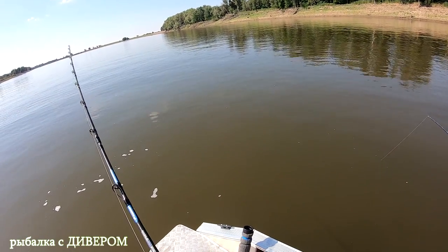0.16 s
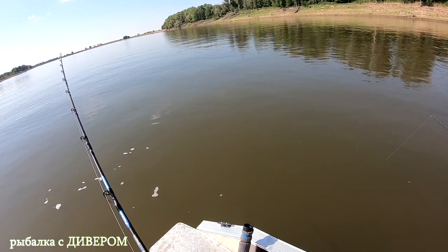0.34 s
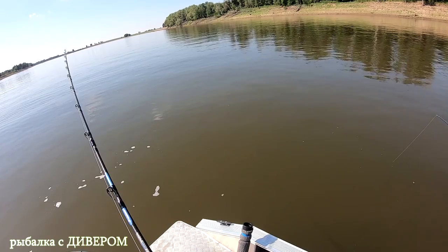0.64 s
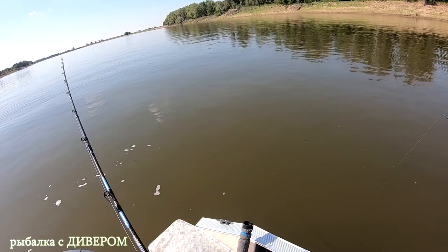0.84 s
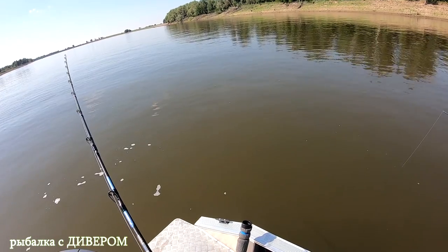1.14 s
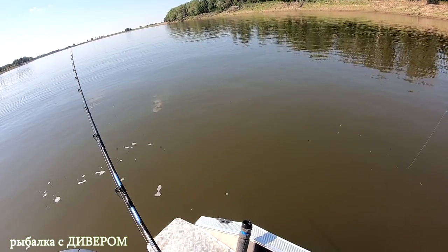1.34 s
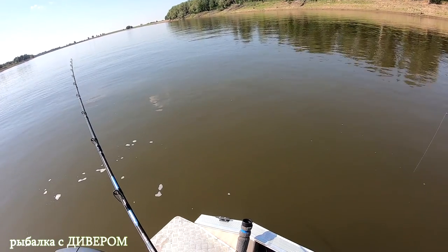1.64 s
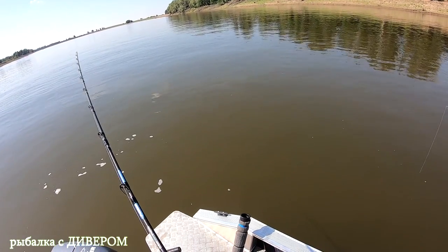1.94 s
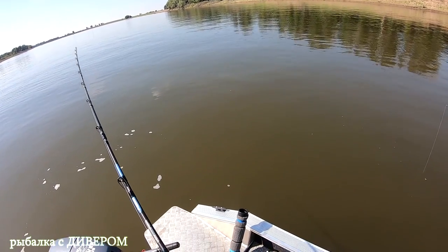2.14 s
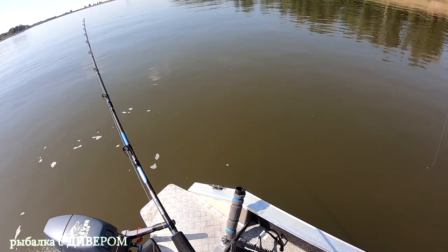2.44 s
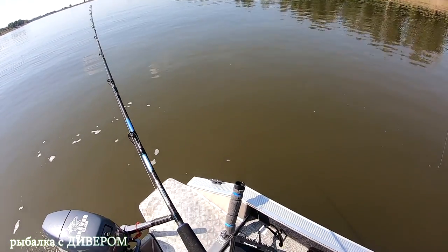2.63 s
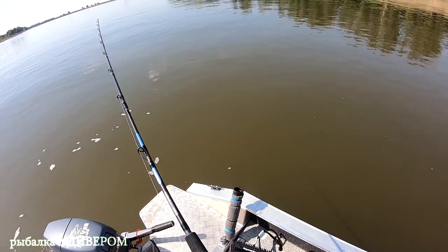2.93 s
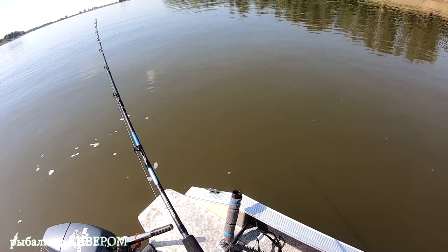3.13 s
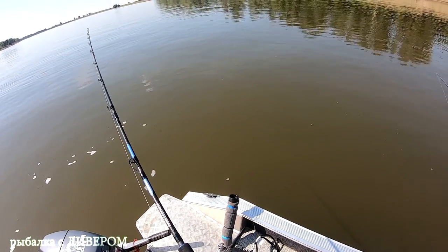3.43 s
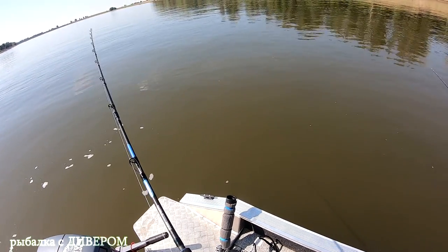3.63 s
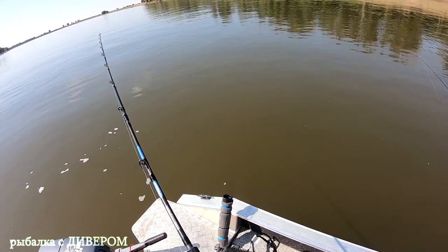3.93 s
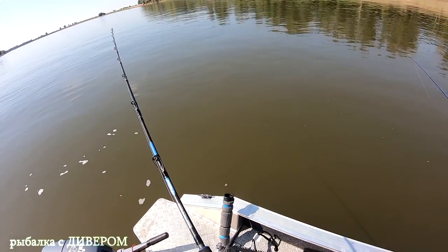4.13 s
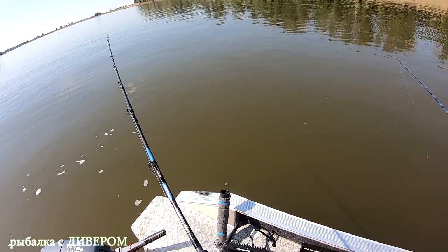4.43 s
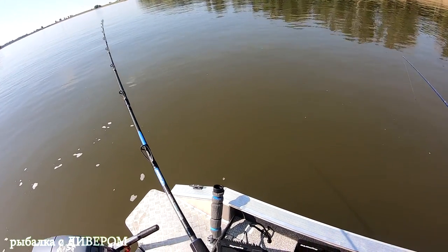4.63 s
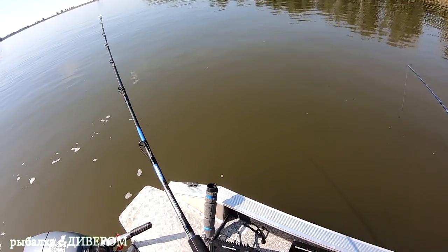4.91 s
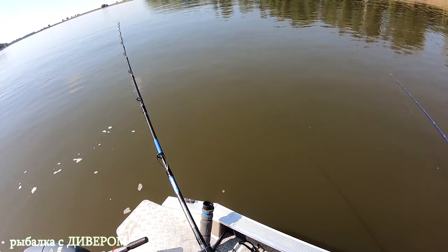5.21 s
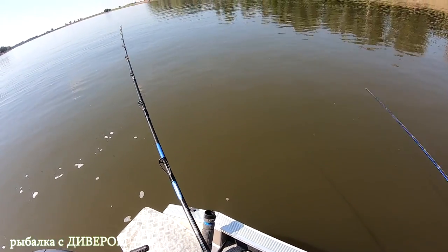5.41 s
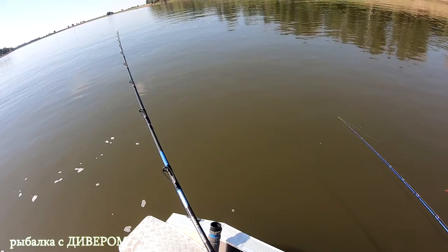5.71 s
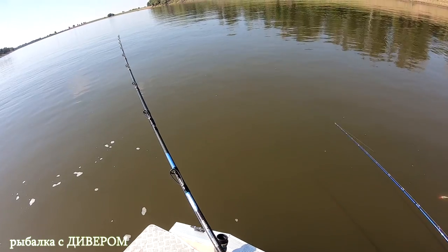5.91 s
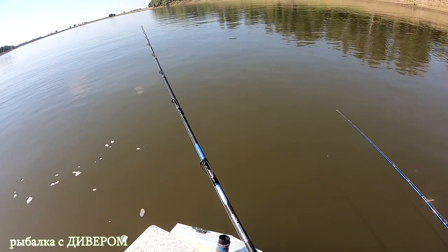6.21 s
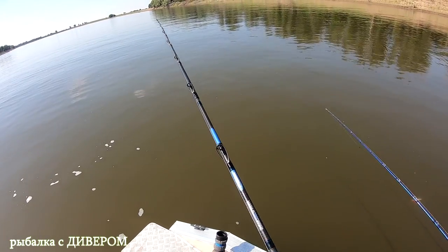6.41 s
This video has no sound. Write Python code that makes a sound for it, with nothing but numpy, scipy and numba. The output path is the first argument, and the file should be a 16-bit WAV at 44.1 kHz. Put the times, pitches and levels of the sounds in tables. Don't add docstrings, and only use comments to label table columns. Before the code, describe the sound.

Loud, uneven motor putter fills the foreground from start to end: fast clusters of deep exhaust knocks, spitting gas, then weak misfired puffs. A fine rapid ratchet from a hand-wound reel sits quietly on the right, then stops near three seconds. Small watery warbles, scattered metallic ticks and a soft hiss of wash surround it. Close stereo pickup aboard a small boat, open air, no echo.

```python
import sys
import numpy as np
from scipy import signal
from scipy.fft import rfft, irfft
from scipy.io import wavfile
from numba import njit

SR = 44100
rng = np.random.default_rng(int(sys.argv[2]) if len(sys.argv) > 2 else 0)


def generate_wav(sig):
    pcm = np.round(np.clip(np.atleast_2d(sig).T, -1, 1) * 32767).astype(np.int16)
    wavfile.write(sys.argv[1], SR, pcm)


def elevation(decibels):
    levels = np.asarray(decibels, float)
    return 10 ** (levels / 20)


N = 289296

# t/s, thump peak level/dB, crack level/dB, thump step per further firing/dB
SPELLS = [(0.025, -7.5, -39, 11), (0.1153, -6, -46, -0.5), (0.2669, -4, -43, -0.5),
          (0.5475, -6, -45.5, 0.5), (0.6799, -5.5, -45.5, 0), (1.1759, -5.5, -41.5, -0.5),
          (1.51, -8, -42, 4), (1.861, -6.5, -42.5, 1), (2.007, -8, -42.5, -1.5), (2.3298, -6, -41, -5),
          (2.443, -11.5, -40.5, 2), (2.6593, -3, -40, -2.5), (2.7874, -7, -39.5, 1.5),
          (2.9434, -6.5, -40, -1), (3.1573, -5.5, -44, -1), (3.2768, -3.5, -40.5, -5.5),
          (3.6409, -5, -40, -0.1), (3.893, -5, -40.5, -3.5), (4.144, -6.5, -41, 0.5),
          (4.3815, -15.5, -40.5, 2.1), (4.611, -8, -42.5, 1.5), (4.7918, -11.5, -42, 2.5),
          (5.0291, -4.5, -46.5, -5), (5.397, -7.5, -42.5, -2.5), (5.5136, -10, -41.5, 2),
          (5.7525, -5, -38, 3), (5.846, -3.5, -45, -1), (6.057, -5.5, -38, -3), (6.256, -9.5, -49, 3.5),
          (6.345, -6, -41, -10.5)]
RHYTHMS = [(3, 3, 2), (5, 5, 4), (9, 9, 8), (4, 4, 3), (16, 4, 3), (11, 4, 2), (12, 4, 2), (5, 5, 3),
           (11, 4, 2), (4, 4, 3), (7, 7, 5), (4, 4, 2), (5, 5, 3), (7, 4, 2), (4, 4, 3), (12, 4, 2),
           (8, 8, 6), (8, 4, 2), (8, 4, 2), (8, 8, 7), (6, 6, 5), (8, 4, 3), (12, 4, 2), (4, 4, 2),
           (8, 8, 6), (3, 3, 1), (7, 4, 2), (7, 4, 2), (3, 3, 2), (8, 4, 2)]
CRACK_BY_PLACE_DB = [0.22, 1.1, -1.3, -2.7]
# t/s, thump change/dB, bark change/dB, crack change/dB
ODD_FIRINGS = [(0.0553, -8, 4, -6), (0.112, 2, -9.5, -4.5), (0.146, 1.5, 0, 2.5), (0.1754, 4, -1, 9),
               (0.4207, -0.5, -3, -6.5), (0.547, 1, -2, 0.5), (0.6795, 1, 3, 5), (0.7418, 0.5, -4.5, -0.5),
               (0.8036, 0.5, -1, -1), (0.8355, -0.5, -5, 2), (0.9606, -3.5, -5.5, 5), (0.9901, -3, 1, -2),
               (1.0536, 1, -2, -3.5), (1.1137, -4.5, -11, -2), (1.509, -1.5, 0, 0), (1.5386, -1, 4, 0.5),
               (1.6259, -0.5, -1.5, 3), (2.1263, 3.5, -3.5, 3), (2.238, -0.5, 0.5, 2.5),
               (2.3269, -3.5, -4, 2.5), (2.355, 3.5, 6, 0.5), (2.3813, 8.5, -4.5, -0.5),
               (2.4738, 3.5, 5, -1.5), (2.5027, -0.5, -3, -5.5), (2.7873, -1, 1.5, 1),
               (2.9452, -2.5, -2.5, -0.5), (3.0961, 2.5, 2.5, -4.5), (3.7021, -3, -4.5, -12.5),
               (4.383, 4.5, 5, 0.5), (4.408, 6.5, -3.5, -2), (4.5253, 1, -1.5, 4.5), (4.7008, 1.5, -2.5, 1),
               (4.731, -2, -3, -0.5), (4.7914, 4, -7.5, -6.5), (4.9077, 1.5, 0.5, -8),
               (4.942, -1.5, -9.5, 0), (4.9704, 3, 3, 3), (5.0273, 0, -19, -0.5), (5.0584, 3.5, 3.5, 4.5),
               (5.1791, 1.5, -2.5, 2.5), (5.3021, 5, -5.5, -4), (5.5132, 3.5, -5, 0.5),
               (5.601, 1.5, -11, 1.5), (5.6325, -4.5, -5, 3.5), (5.9629, 3, -3, 5),
               (6.1952, 2.5, -12.5, -13.5), (6.257, 3, -17, 8), (6.344, 1.5, 2.5, 9), (6.3729, 10, 0.5, -3)]
# t/s, thump change/dB, bark change/dB, crack change/dB
ODD_PUFFS = [(0.6437, 1, -13, -1.5), (0.769, -1.5, -8, -7), (1.3816, 1, -9, 2.5), (1.5637, 1, -0.5, -1.5),
             (1.5924, 0.5, 1, 3), (1.828, -1.5, 6, -4), (2.0932, -5, -3, 1), (2.1801, -2.5, 5.5, 5.5),
             (2.2968, 0.5, 8, 3), (2.4122, 3, 0, -1), (2.7508, 0.5, -6, -5.5), (2.878, -1, -10, -1.5),
             (3.0017, 0.5, -8.5, -1), (3.2455, 1, -2, -0.5), (3.3346, -11.5, 22.5, -2.5),
             (3.4574, -3.5, 10, 3.5), (3.4843, 0.5, -3, -1), (3.575, -1.5, 2, 4), (3.827, -1.5, -1, -6),
             (3.9841, -5.5, -10, -7), (4.1124, -1, -9, 2.5), (4.2331, -6, 10, 3.5), (4.321, -2, 1.5, 4.5),
             (4.3489, -2.5, 10, 3), (4.8775, 2, -7, 4.5), (4.9928, -2, -2, -5.5), (5.0857, -3.5, 10, 2),
             (5.1133, -1, -4, -6), (5.2137, -2, 0.5, -3.5), (5.2411, 0, -20, 2.5), (5.3343, -3, -8, -7.5),
             (5.4535, -4.5, 5, 2), (5.8129, -1, -6.5, -0.5), (5.934, 1.5, 6.5, 9), (6.1392, 3, 0, 5),
             (6.5123, 2.5, 5.5, -0.5)]
# t/s, crack level change/dB
ODD_CRACKS = [(0.056, 1.5), (0.09, -12), (0.299, -1.5), (0.549, -2.5), (0.837, 0.5), (0.866, 3),
              (0.961, -1), (1.084, 3), (1.266, -8), (1.328, -2.5), (1.45, -5), (1.511, 2.5), (1.745, 1),
              (1.946, -5), (2.096, -2), (2.211, 0.5), (2.27, -0.5), (2.596, -5), (2.946, 4.5), (2.975, -3),
              (3.307, -1.5), (3.489, 3), (3.829, -1), (3.956, 6), (3.983, -1), (4.293, -1.5), (4.44, -4),
              (4.554, 4), (4.672, 4.5), (4.761, 2.5), (5.004, 1), (5.152, 2.5), (5.181, -1), (5.304, 3.5),
              (5.428, 2.5), (5.458, -2), (5.515, 0), (5.544, -2), (5.602, 1), (5.877, 4), (5.964, -0.5),
              (5.995, 5.5), (6.223, 2), (6.286, 2), (6.346, -4.5)]
# t/s, pitch change of the three lower leg modes/semitones
ODD_PITCH = [(0.025, 0), (0.09, 3), (0.115, -2), (0.207, -0.5), (0.517, 4), (0.614, 0.5), (0.837, 1.5),
             (0.961, 2), (0.991, -2), (1.266, 2.5), (1.511, 2.5), (1.92, 2.5), (2.069, -4.4), (2.154, 2),
             (2.184, -2), (2.299, -1), (2.504, 0), (2.789, -1.5), (2.899, 3.5), (3.067, 0.2), (3.129, 1),
             (3.188, 1.2), (3.335, 3.5), (3.829, -3), (3.861, 2), (3.925, 2.6), (3.983, -2), (4.051, 2),
             (4.119, 4), (4.233, 5), (4.355, -1.5), (4.383, -6), (4.41, 2), (4.44, -4.7), (4.496, -2),
             (4.584, 3.5), (4.612, -5.5), (4.761, 3.5), (4.791, -0.5), (4.905, -4), (5.004, -3.7),
             (5.096, -4), (5.215, 1.5), (5.245, 2), (5.304, 1.5), (5.34, -1), (5.366, 3.5), (5.515, -4.5),
             (5.575, -6), (5.602, 4), (5.663, 3), (5.723, 3.5), (5.785, 3.0), (5.936, -1), (5.964, 2),
             (6.198, -2.5), (6.257, 2), (6.374, 1.5)]
TURN_S = 0.029
KICK_S = 0.00061
PUFF_DB = -9.5

# f/Hz, level/dB, decay/ms, build-up/ms
LEG = [(87, -20.5, 3.1, 3.2), (154.4, -4.5, 8.1, 2.11), (227.8, -13.5, 7, 1.56), (393.5, -15, 1.8, 0.74),
       (581, -29.5, 1.5, 0.82)]
# t/s, level/dB, half length/s
STUMBLES = [
    (2.294, -2.5, 0.037),
    (3.34, -5.5, 0.065),
    (5.62, -8, 0.051),
    (5.967, -8.5, 0.036),
]
HOT_PITCH = 1.042
COLD_GLIDE_PER_MS, COLD_LINGER = 0.028, 1.61
HOT_BOTTOM_DB, COLD_BOTTOM_DB = -11.5, 7.5
COLD_BARK_DB, COLD_BARK_PITCH, COLD_BARK_LINGER = -0.5, 0.99, 1.36
MIDDLE_SWELL = 1.25

# order [multiple of the turn rate], rms level/dB, phase at the thump/rad
HULL_ORDERS = [(1, -33.5, -2), (2, -34.5, 0.46)]

# f/Hz, density level/dB per Hz
GAS = [(410, -22), (700, 0), (845, -2.5), (1240, 1), (2080, -6.5), (2930, -6), (3220, 0), (4500, -10),
       (7350, -13.5), (8510, -40.5), (11100, -51.5), (18700, -120)]
# f/Hz, bandwidth/Hz, level/dB
COWL = [(1232, 130, -0.5), (1450, 20, -12), (2527, 230, -4), (3560, 51, -0.5), (3960, 130, -6),
        (5950, 56, -16.5), (7800, 420, -17.5)]
REBOUND_MS, REBOUND_DB = 5.6, 4.5
AIR_DB, AIR_DB_PER_S = -74.5, 0

# f/Hz, density level/dB per Hz
WASH = [(410, -27), (700, -0.5), (845, -8), (1530, 1.5), (2080, -7.5), (2930, -13.5), (3250, -9),
        (4450, -17), (7120, -18), (8510, -25), (11100, -43.5), (18700, -120)]
# f/Hz, density level/dB per Hz
BURBLE = [(25, -21.5), (70, -13.5), (120, -7.5), (165, -9), (250, -6), (310, -19.5), (400, -21),
          (540, -27.5), (640, -25.5), (700, -32.5), (800, -44)]
# f/Hz, density level/dB per Hz
WIND = [(15, -2), (40, -4.5), (120, -3.5), (300, -34.5), (600, -21.5), (1000, -29)]
# f/Hz, level under the shared part/dB
PORT_DIFFERENCE = [(500, -19), (1000, -14.5), (2000, -9), (4000, -11), (7000, -5), (9000, 0.5), (12000, -6)]
# t/s, share turned to the wake [0-1]
FACING = [(0.0, 0.04), (1.0, .05), (1.85, 0.07), (2.1, 1), (2.4, 0.9), (2.55, 0), (3.1, 0.1), (3.32, 0.8),
          (3.9, .8), (4.46, 0.5), (4.86, 1), (5.5, 0.98), (6.0, 0.77), (6.56, 0.4)]
BOOM_SWING_DB, BARK_SWING_DB, WASH_SWING_DB = -27, 1.5, 2

# f/Hz, bandwidth/Hz, level/dB, change over a full swing/dB
POCKETS = [(2457, 260, -38, 3), (1168, 160, -38, -10), (1500, 210, -39, 0.5)]
SCRAPS_PER_S, SCRAP_SPREAD = 16, 0.08

# t/s, pawl teeth passed [count]
REEL = [(.020, 0), (.176, 6), (.450, 15), (.647, 24), (.769, 28), (.873, 31), (1.148, 42), (1.408, 51),
        (1.616, 60), (1.731, 64), (1.841, 67), (1.935, 70), (2.086, 76), (2.269, 82), (2.441, 87),
        (2.650, 95), (2.774, 99), (2.911, 102)]
# f/Hz, level/dB, decay by 60 dB t60/s
PAWL = [(5640, -2, 0.011), (7420, 0, 0.0074), (8000, 0, 0.0027), (9500, -8.5, 0.0063), (10200, -8, 0.0055),
        (11800, -12.5, 0.0018), (14000, -12.5, .0015)]
PAWL_DB, PAWL_LEFT_DB = -41.5, -9.5

# t/s, peak level/dB, left over right level/dB
TICKS = [(0.21, -37, 9), (0.384, -38.5, 2.5), (0.552, -37.5, 2.5), (0.6276, -44, 4.5), (3.299, -37.5, 3.5),
         (3.301, -27.5, -2), (3.3295, -38.5, 2.5), (1.253, -31.5, -1.5), (1.294, -41.5, -5),
         (1.426, -47.5, 0.5), (1.768, -40, -8.5), (2.111, -29, 4.5), (2.257, -35, -2.5), (2.351, -34, 0.5),
         (2.404, -38, -5.5), (2.46, -36, 1.5), (2.4783, -37.5, -12.5), (2.562, -37.5, -7.5),
         (3.5014, -41, 0), (3.957, -39.5, 3.5), (3.993, -47.5, -2), (4.366, -33.5, -3.5),
         (4.4577, -32.5, 4), (4.4944, -40, 0), (4.664, -34.5, 4), (5.5093, -45.5, -1), (5.777, -52, 1),
         (5.9868, -35.5, 4), (6.529, -44, -7.5)]
TICK_TOP_DB = -35

# t/s, length/s, first f/Hz, last f/Hz, level/dB
SONGS = [(.50, 0.075, 1484, 1510, -49), (.68, 0.2, 1520, 1507, -55), (1.04, 0.092, 1507, 1616, -56),
         (1.26, 0.086, 1500, 1624, -49.5), (1.41, 0.052, 1580, 1500, -48), (1.72, 0.081, 1358, 1510, -48.5),
         (2.21, 0.042, 2800, 2750, -57), (2.48, 0.085, 2880, 2600, -53), (2.61, 0.079, 2410, 2350, -60),
         (2.675, 0.083, 2660, 2540, -56), (2.70, 0.052, 1254, 1214, -54), (2.90, 0.079, 2230, 2420, -56),
         (2.97, 0.048, 2420, 2220, -53), (3.0, 0.29, 1437, 1530, -64), (3.10, 0.05, 2140, 2290, -53),
         (3.37, 0.062, 2220, 2270, -52), (3.50, 0.11, 2620, 2580, -63), (3.86, 0.097, 2650, 2770, -57),
         (4.10, 0.067, 2686, 2580, -52), (4.12, 0.11, 2300, 2300, -50), (4.15, .08, 1537, 1480, -61),
         (4.27, 0.098, 2175, 2150, -56), (4.39, 0.079, 2340, 2240, -52.5), (4.60, 0.064, 2560, 2647, -50.5),
         (4.78, 0.041, 2590, 2680, -56.5), (4.82, 0.063, 1405, 1490, -47), (4.95, .09, 2555, 2590, -53),
         (5.04, 0.067, 1490, 1495, -43.5), (5.11, 0.051, 2810, 2740, -51), (5.25, 0.087, 1520, 1493, -47.5),
         (5.43, 0.11, 2160, 2300, -54), (5.62, 0.036, 1600, 1806, -41), (5.70, 0.17, 1520, 1540, -54),
         (5.85, 0.079, 2220, 1990, -58), (6.01, 0.095, 1520, 1573, -53), (6.29, .07, 2240, 2210, -52.5),
         (6.36, 0.11, 1600, 1596, -52), (6.48, 0.11, 1880, 2070, -54.5)]


def rms_one(x):
    return x / np.sqrt(np.mean(x ** 2) + 1e-20)


def in_time(rows):
    s, *columns = np.transpose(rows)
    return [np.interp(np.arange(N) / SR, s, c) for c in columns]


def drift(rate):
    r = np.exp(-80 * np.pi * rate / SR)
    chance = rng.standard_normal(N // 40 + 2002)
    slow = signal.lfilter([1], [1, -2 * r, r * r], chance)[2000:]
    return np.interp(np.arange(N) / 40, np.arange(len(slow)), rms_one(slow))


def colour(x, spectrum):
    hz, db = np.transpose(spectrum)
    bin_hz = np.arange(N // 2 + 1) * SR / N
    gain = elevation(np.interp(np.log(bin_hz + 1), np.log(hz), db, left=-90, right=-90))
    return irfft(rfft(x) * rms_one(gain), N)


def stereo_noise():
    mid, side = rng.standard_normal((2, N))
    hz, db = np.transpose(PORT_DIFFERENCE)
    gain = elevation(np.interp(np.arange(N // 2 + 1) * SR / N, hz, db))
    side = irfft(rfft(side) * gain, N)
    return mid + side * [[1], [-1]]


@njit
def resonance(x, hz, width_hz, sr):
    y = np.zeros(len(x))
    r = np.exp(-np.pi * width_hz / sr)
    for i in range(2, len(x)):
        drive = (1 - r * r) / 2 * (x[i] - x[i - 2])
        y[i] = drive + 2 * r * np.cos(2 * np.pi * hz[i] / sr) * y[i - 1] - r * r * y[i - 2]
    return y


def scatter(at_s, shapes, lead):
    margin = 2000
    out = np.zeros(N + 8000)
    first = np.round(at_s * SR).astype(int)[:, None] + margin - lead
    np.add.at(out, first + np.arange(shapes.shape[1]), shapes)
    return out[margin:N + margin]


def per_turn(turn_s, table):
    s, change = np.transpose(table)
    out = np.zeros(len(turn_s))
    out[np.argmin(abs(turn_s[:, None] - s), axis=0)] = change
    return out


def swing():
    facing, = in_time(FACING)
    return facing - facing.mean()


def turns(early_s=0.0025, puff_spread_db=1.2, leak_db=-51.0, thump_spread_db=1.1, crack_spread_db=1.2):
    start_s, thump_db, crack_db, step_db = np.transpose(SPELLS)
    count, lope, firing = np.transpose(RHYTHMS)
    first = np.r_[0, np.cumsum(count)]
    number = np.arange(first[-1])
    spell = np.repeat(np.arange(len(count)), count)
    place = (number - first[spell]) % lope[spell]
    fired = place < firing[spell]
    s = np.interp(number, first, np.r_[start_s, start_s[-1] + count[-1] * TURN_S])
    chance = rng.standard_normal((len(s), 3))

    hot_thump_db = thump_db[spell] + step_db[spell] * place + thump_spread_db * chance[:, 0]
    hot_crack_db = crack_db[spell] + np.take(CRACK_BY_PLACE_DB, place, mode="clip")
    hot_crack_db = hot_crack_db + crack_spread_db * chance[:, 2]
    hot = np.c_[s - KICK_S * (place > 0), hot_thump_db, hot_crack_db]
    cold_s = s - early_s + 0.0012 * chance[:, 1]
    cold = np.c_[cold_s, PUFF_DB + puff_spread_db * chance[:, 0], leak_db + 2.5 * chance[:, 2]]

    rows = np.c_[np.where(fired[:, None], hot, cold), fired]
    rows = np.r_[[[s[0] - TURN_S, PUFF_DB, leak_db, 0]], rows]
    rows = np.c_[rows, COLD_BARK_DB * (1 - rows[:, 3])]
    for at_s, thump, bark, crack in ODD_FIRINGS + ODD_PUFFS:
        row = np.argmin(abs(rows[:, 0] - at_s))
        rows[row] += [at_s - rows[row, 0], thump, crack, 0, bark]
    rows[:, 2] += per_turn(rows[:, 0], ODD_CRACKS)
    return rows[rows[:, 0] < N / SR]


def thumps(rows, cold_pitch=0.74, sag_per_db=0.018, cold_tilt_db=-4, detune=0.025, mode_spread_db=0.7):
    s, thump_db, crack_db, fired, odd_db = rows.T[:, :, None]
    ms = np.arange(-600, 2200) / SR * 1000
    heat = np.where(fired, np.minimum(HOT_PITCH - sag_per_db * (thump_db + 8.0), 1.15), cold_pitch)
    heat = heat * 2 ** (per_turn(s[:, 0], ODD_PITCH)[:, None] / 12)
    bark_db = BARK_SWING_DB * swing()[np.maximum(s * SR, 0).astype(int)] + odd_db
    glide_ms = ms + (1 - fired) * COLD_GLIDE_PER_MS * ms ** 2 / 2
    choke_db = sum(db * np.exp(-((s - at_s) / half_s) ** 2) for at_s, db, half_s in STUMBLES)
    thump_db = thump_db + choke_db
    shapes = 0
    for hz, db, decay_ms, rise_ms in LEG:
        upper = hz > 300
        chance = rng.standard_normal((3, len(rows), 1))
        level_db = db + mode_spread_db * chance[0] + bark_db * upper
        level_db = level_db + (1 - fired) * cold_tilt_db * np.log2(hz / 152)
        level_db = level_db + np.where(fired, HOT_BOTTOM_DB, COLD_BOTTOM_DB) * (hz < 100)

        pitch = np.where(fired, HOT_PITCH, COLD_BARK_PITCH) if upper else heat
        pitch = pitch * (1 + 0.059 * upper * chance[2])
        cold_linger = COLD_LINGER * (COLD_BARK_LINGER if upper else 1)
        linger = np.where(fired, 1, cold_linger) * np.exp(0.29 * upper * chance[1])
        swell = MIDDLE_SWELL if 100 < hz < 300 else 1
        envelope = 2 * np.exp(-ms / decay_ms / linger) / (1 + np.exp(-ms / rise_ms / swell))

        run_ms = ms if upper else glide_ms
        angle = 2 * np.pi * hz * pitch * (1 + detune * chance[1]) * run_ms / 1000
        angle = angle + (0.1 + 0.3 * (1 - fired)) * chance[2]
        shapes = shapes + elevation(level_db) * envelope * np.cos(angle)
    shapes = elevation(thump_db) * shapes * signal.windows.tukey(len(ms), 0.3)
    return scatter(s[:, 0], shapes, lead=600)


def hull(rows):
    crank = 2 * np.pi * np.interp(np.arange(N) / SR, rows[:, 0], np.arange(len(rows)))
    return sum(np.sqrt(2) * elevation(db + 1.1 * drift(2.0)) * np.cos(k * crank + rad)
               for k, db, rad in HULL_ORDERS)


def cracks(rows, opens_ms=10, bang_ms=6.8, die_ms=7.0, cowl_db=6.5, grit_db=2.0):
    ms = np.arange(1800) / SR * 1000
    chance = rng.standard_normal((3, len(rows), 1))
    hiss = (1 - np.exp(-ms / 0.061)) * np.exp(-ms / die_ms)
    since = np.maximum(ms - opens_ms + bang_ms + 0.2 * chance[0], 0)
    bang_decay = np.exp(-since / die_ms) + 0.15 * np.exp(-since / 1.5)
    bang = elevation(11 + 1.8 * chance[1]) * (1 - np.exp(-since / 0.25)) * bang_decay
    after = np.maximum(since - REBOUND_MS, 0)
    rebound = elevation(REBOUND_DB + 3.0 * chance[0]) * (1 - np.exp(-after / 0.72)) * np.exp(-after / 3.5)
    bursts = elevation(rows[:, 2, None] - 9.0) * (hiss + bang + rebound)
    open_s = rows[:, 0] - opens_ms / 1000 + 0.00063 * chance[2, :, 0]
    gate = scatter(open_s, bursts, lead=0)
    gas = stereo_noise() * gate * elevation(grit_db * drift(480))

    boom_db = BOOM_SWING_DB * swing()
    cowl = 0
    for k, (hz, width_hz, db) in enumerate(COWL):
        b, a = signal.iirpeak(hz, hz / width_hz, fs=SR)
        share_db = db + 2.7 * drift(34) + boom_db * (k == 0)
        cowl = cowl + (-1) ** k * signal.lfilter(b, a, gas * elevation(share_db))
    cowl = signal.sosfilt(signal.butter(3, 10500, fs=SR, output="sos"), cowl)

    air_band = signal.butter(3, [8600, 12300], "band", fs=SR, output="sos")
    air = signal.sosfilt(air_band, gate ** 0.85 * elevation(4.0 * drift(500)) * stereo_noise())
    air_db = AIR_DB + AIR_DB_PER_S * np.arange(N) / SR
    return elevation(-0.5) * colour(gas, GAS) + elevation(cowl_db) * cowl + elevation(air_db) * rms_one(air)


def water():
    wash = colour(stereo_noise(), WASH) * elevation(-48.5 + WASH_SWING_DB * swing() + 3.0 * drift(80))
    burble = colour(rng.standard_normal(N), BURBLE) * elevation(-29 + 2.2 * drift(22))
    wind = colour(rng.standard_normal((2, N)), WIND) * elevation(-41.0 + 0.85 * drift(5.8))
    return wash + burble + wind


def jet():
    out = 0
    for hz, width_hz, db, swing_db in POCKETS:
        scrap = np.cumsum(rng.random(N) < SCRAPS_PER_S / SR)
        pitch, strength = np.clip(rng.standard_normal((400, 2)), -2, 2)[scrap].T
        level_db = db + swing_db * swing() + 2.8 * drift(51) + 2 * strength
        noise = rng.standard_normal(N) * elevation(level_db)
        spread = SCRAP_SPREAD * 1300 / np.sqrt(1300 * hz)
        moving_hz = hz * (1 + spread * pitch + 0.04 * drift(7.8))
        once = resonance(noise, moving_hz, width_hz, SR)
        out = out + resonance(once, moving_hz, width_hz, SR)
    out = out + songs()
    lagged = np.roll(out, 2)
    return np.array([elevation(-4.5) * lagged, elevation(2.5) * out])


def reel():
    s, teeth = np.transpose(REEL)
    at_s = np.interp(np.arange(teeth[-1] + 1), teeth, s)
    t = np.arange(600) / SR
    attack = 1 - np.exp(-t / 0.0003)
    sides = []
    for side_db, lag_s in ((PAWL_LEFT_DB, 0.0001), (0, 0)):
        chance = rng.standard_normal((len(at_s), len(PAWL), 3))
        rings = 0
        for k, (hz, level_db, t60) in enumerate(PAWL):
            envelope = elevation(level_db + 2.7 * chance[:, k, :1] - 60 * t / t60)
            mode_hz = hz * (1 + 0.042 * chance[:, k, 1:2])
            rings = rings + envelope * np.sin(2 * np.pi * mode_hz * t + chance[:, k, 2:])
        sides.append(scatter(at_s + lag_s, elevation(PAWL_DB + side_db) * rings * attack, lead=0))
    return np.array(sides)


def rattle():
    s, db, pan_db = np.transpose(TICKS)
    ms = np.arange(300) / SR * 1000
    clicks = rng.standard_normal((len(s), len(ms))) * np.exp(-ms / 1.0)
    sides = []
    for way in (1, -1):
        gain = elevation(db + 6.5 + way * pan_db / 2)[:, None]
        sides.append(scatter(s - 0.0006, gain * clicks, lead=0))
    body = signal.sosfilt(signal.butter(4, [3700, 7200], "band", fs=SR, output="sos"), sides)
    top = signal.sosfilt(signal.butter(4, 7500, "high", fs=SR, output="sos"), sides)
    return body + elevation(TICK_TOP_DB) * top


def songs():
    out = np.zeros(N + SR)
    waver, flutter_db = drift(67), 3.9 * drift(60)
    for s, length_s, from_hz, to_hz, db in SONGS:
        at = int(s * SR) + np.arange(int(length_s * SR))
        at = at[at < N]
        hz = np.linspace(from_hz, to_hz, len(at)) * (1 + 0.022 * waver[at])
        note = np.sin(2 * np.pi * np.cumsum(hz) / SR) * signal.windows.tukey(len(at), 0.6)
        out[at] += elevation(db + flutter_db[at]) * note
    return np.sqrt(2) * out[:N]


def scene():
    rows = turns()
    motor = thumps(rows) + hull(rows) + cracks(rows)
    return motor + water() + jet() + reel() + rattle()


def roll_off(x):
    return signal.sosfilt(signal.butter(12, 15700, fs=SR, output="sos"), x)


def record(dry):
    upper = signal.sosfilt(signal.butter(2, 330, "high", fs=SR, output="sos"), dry)
    uneven = dry + 0.062 * upper * [[-1], [1]]
    ports = signal.sosfilt(signal.butter(1, 18, "high", fs=SR, output="sos"), uneven)
    closing = np.minimum(np.arange(N, 0, -1) / 100, 1)
    rounded = 1.395 * np.tanh(ports / 1.146) * closing
    return roll_off(rounded)


dry = scene()
out = record(dry)
generate_wav(out)
```